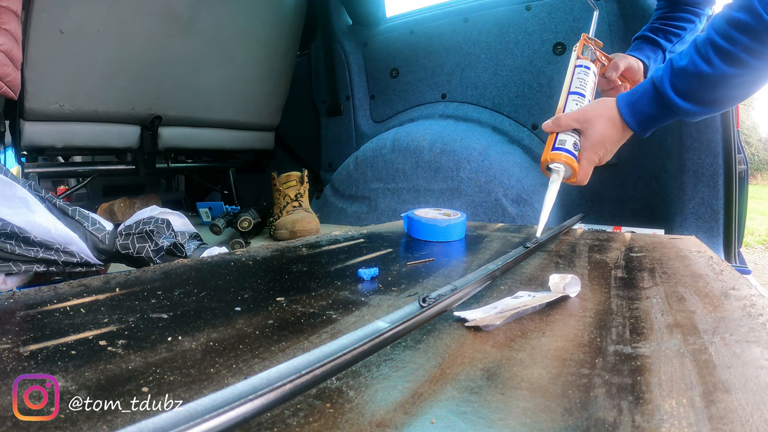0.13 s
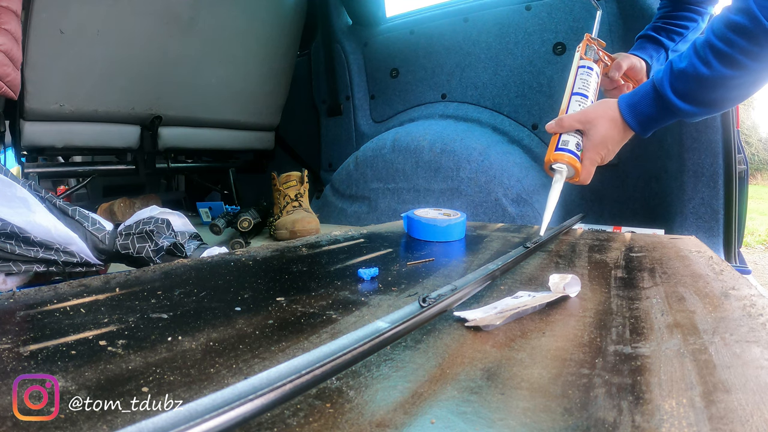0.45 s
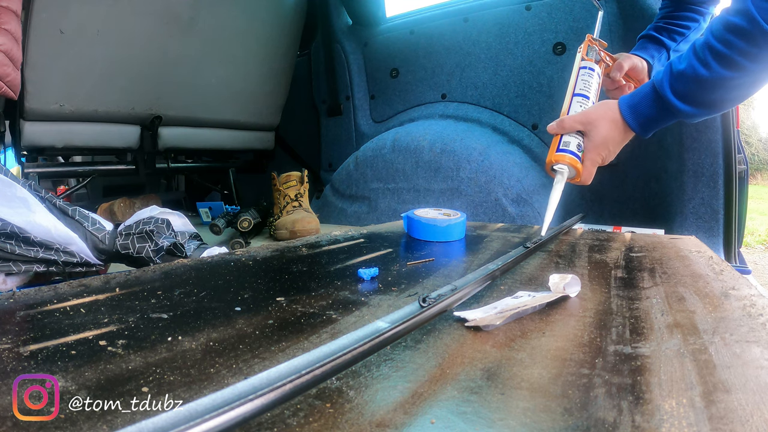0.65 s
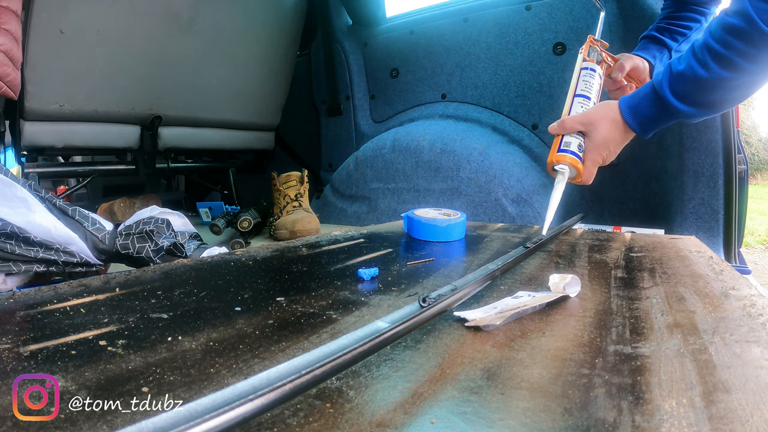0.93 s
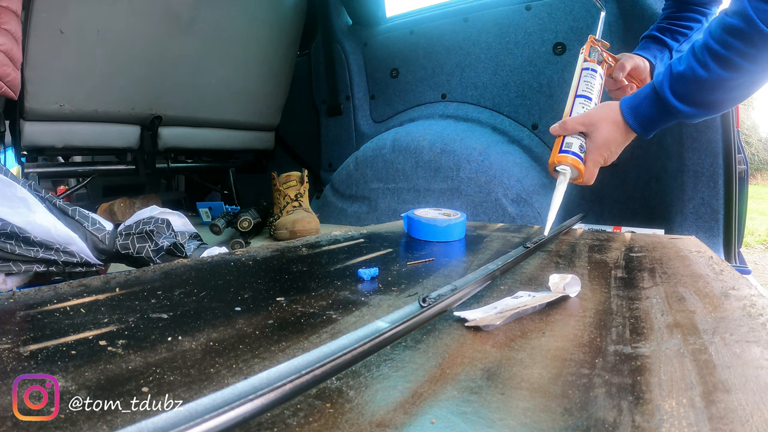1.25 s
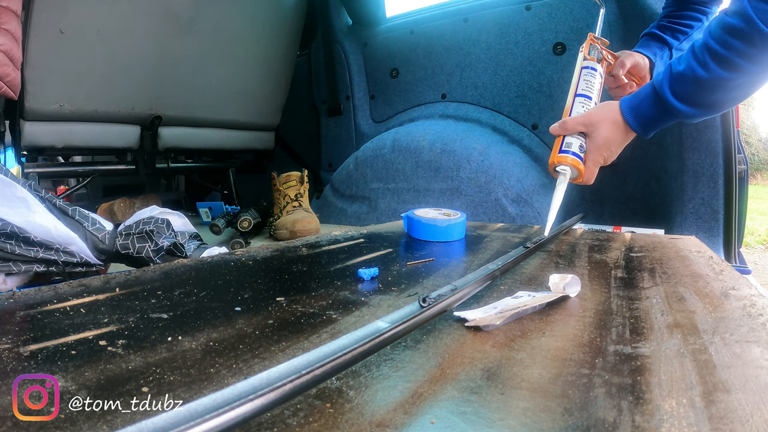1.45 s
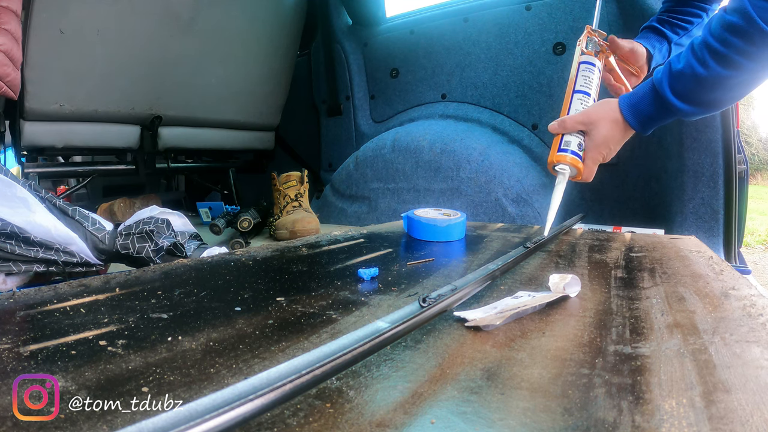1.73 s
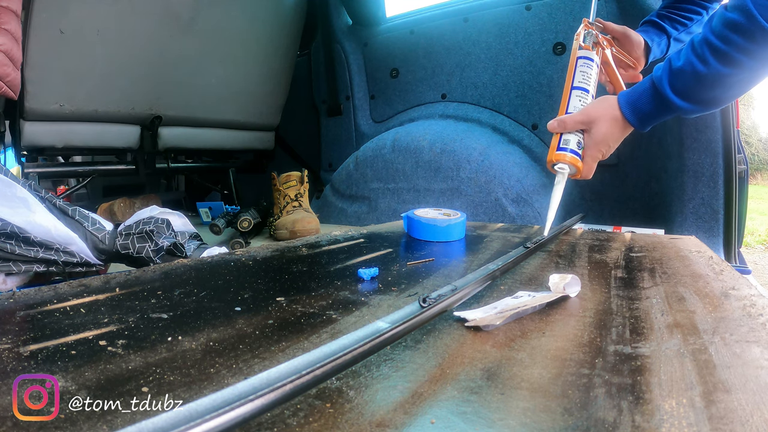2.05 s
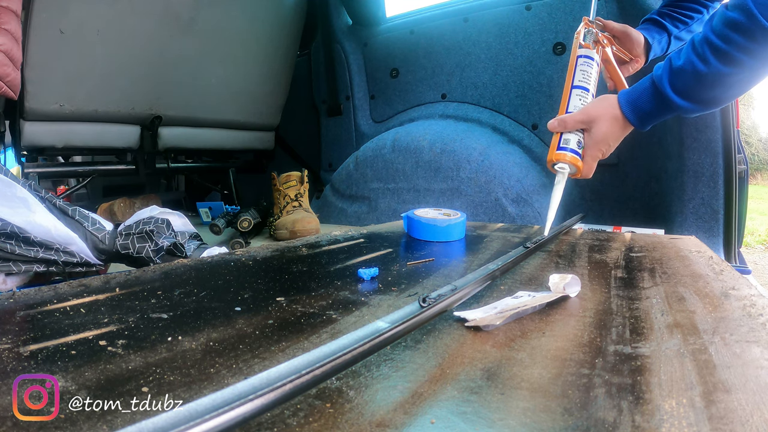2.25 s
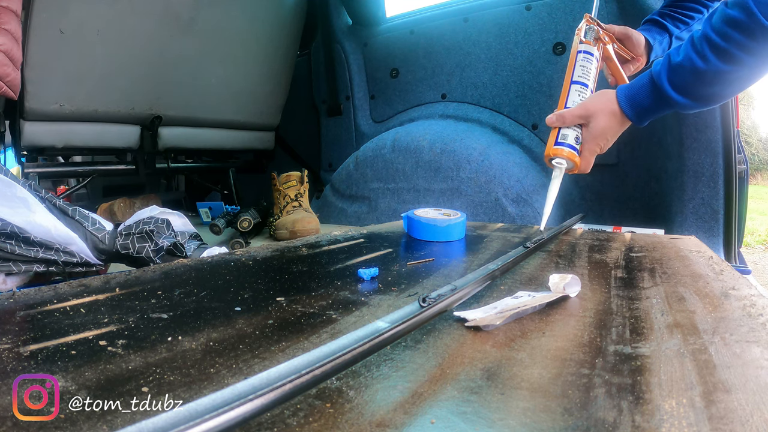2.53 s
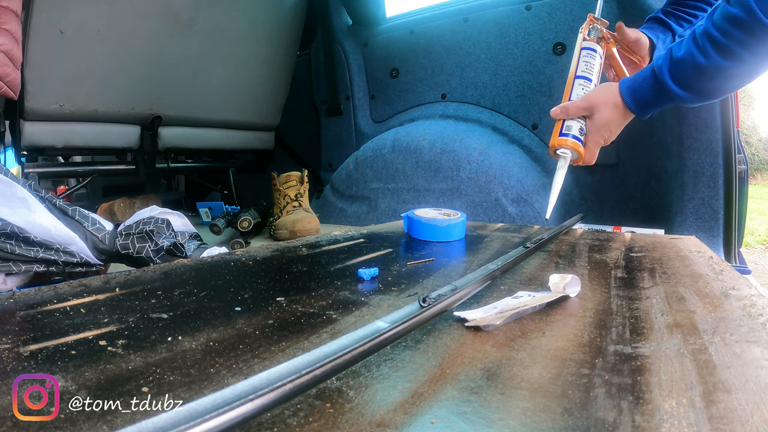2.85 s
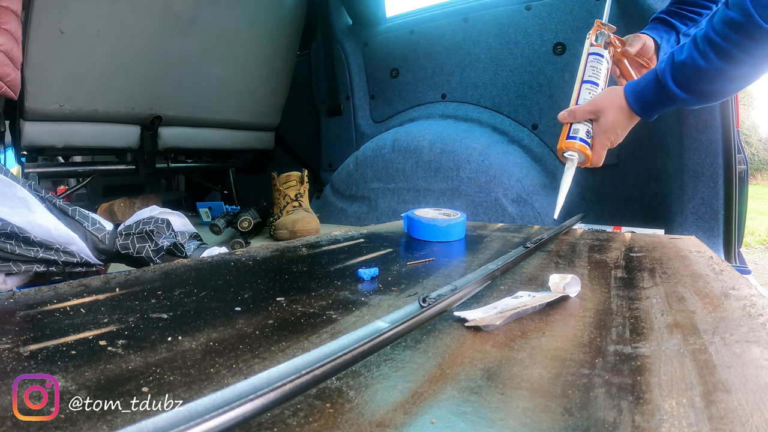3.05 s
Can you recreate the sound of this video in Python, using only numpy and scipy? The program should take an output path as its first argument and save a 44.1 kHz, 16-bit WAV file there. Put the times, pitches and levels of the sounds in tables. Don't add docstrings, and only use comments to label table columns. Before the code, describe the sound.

Metal catch of a caulking gun snaps softly, then cracks loudly, inside a quiet van.

```python
import sys
import numpy as np
from scipy import signal
from scipy.fft import rfft, irfft
from scipy.io import wavfile
from scipy.ndimage import uniform_filter1d

SR = 44100
rng = np.random.default_rng(int(sys.argv[2]) if len(sys.argv) > 2 else 0)


def unload_audio(sound):
    columns = np.transpose(np.atleast_2d(sound))
    steps = np.round(np.clip(columns, -1, 1) * 32767)
    wavfile.write(sys.argv[1], SR, steps.astype(np.int16))


def decibels_to_gain(level_db):
    exponent = np.asarray(level_db, float) / 20
    return 10 ** exponent


N = 141120


def evened(x):
    return x / np.sqrt(np.mean(x ** 2) + 1e-20)


def read(points, hz):
    f, value = np.transpose(points)
    return np.interp(np.log(hz + .1), np.log(f + .1), value)


def add(mix, s, sound):
    part = mix[round(s * SR):][:len(sound)]
    part += sound[:len(part)]


def colour(x, *tables):
    hz = np.fft.rfftfreq(len(x), 1 / SR)
    gain_db = sum(read(table, hz) for table in tables)
    return irfft(rfft(x) * decibels_to_gain(gain_db), len(x))


def ring(modes, flip=False):
    t = np.arange(round(0.8 * SR)) / SR
    out = np.zeros(len(t))
    for k, (hz, db, t60_s) in enumerate(modes):
        sign = (-1) ** (k * flip)
        out += sign * decibels_to_gain(db - 60 * t / t60_s) * np.sin(2 * np.pi * hz * t)
    return out


def burst(x, rise_s, t60_s=100):
    t = np.arange(len(x)) / SR
    return x * np.minimum(t / rise_s, 1) * decibels_to_gain(-60 * np.maximum(t - rise_s, 0) / t60_s)


def snaps():
    # t/s, crack level/dB, crack t60/s, cabin level/dB, metal level/dB
    releases = [
        (1.9683, -32.5, 0.025, -10.5, -45),
        (2.5353, -7, 0.01, -8.5, -18),
    ]
    # f/Hz, level/(dB per Hz)
    spectra = [
        [(300, -9.5), (900, -11.5), (1600, -9), (2800, -7), (4500, -13.5), (6500, -13.5), (10200, -22),
         (16000, -31)],
        [(300, -40.5), (1000, -24.5), (1600, -29), (2600, -22.5), (4900, -8), (7000, -9.5), (10000, -10),
         (16000, -18)],
    ]
    # f/Hz, level/dB, t60/s
    rods = [
        [(554, -22, .3), (1136, -14, .25), (1529, -22, .4), (1701, -25, .5), (1755, -25, .5), (2067, -20, .35),
         (2095, -27, .3), (2471, -9, .25), (2450, -23, .2), (2686, -21, .5)],
        [(425, -29, .3), (630, -28, .18), (985, -50, .5), (1550, -46, .6), (2202, -42, .6), (2227, -48, .6),
         (2972, -48, .5), (4414, -30, .13), (4560, -40, .3), (2552, -36, .12)],
    ]
    # f/Hz, level/dB, t60/s
    clangs = [
        [(937, 6, .04), (1850, 3, .045), (2800, 11, .045), (3580, 17, .024), (1130, 2, .04), (4150, 7, .025),
         (5170, 3, .03), (5780, 1, .025), (7520, -6, .025)],
        [(1050, -17, .025), (1900, -12, .03), (2700, -6, .026), (3570, 1, .028), (4070, -5, .04),
         (4350, -4, .045), (4670, 4, .045), (4870, 4, .045), (5700, -3, .035), (6060, 0, .045),
         (6850, -3, .035), (7740, -1, .022), (8880, -1, .025), (10300, 4, .028)],
    ]
    rises_s = [0.0021, 0.00083]
    sides_db = [-21, 2]
    # delay/s, level/dB
    echoes = [(.0042, -15), (.0072, -15.5), (0.015, -17.5)]
    # f/Hz, side minus mid/dB
    side_spectrum = [(60, -22), (150, -34), (380, -11), (950, -21.5), (2380, -17), (5980, -20),
                     (15000, -19.5)]
    mid, side = np.zeros((2, N))
    for release, spectrum, rod, clang, rise_s, side_db in zip(releases, spectra, rods, clangs, rises_s, sides_db):
        s, crack_db, t60_s, cabin_db, metal_db = release
        crack = decibels_to_gain(crack_db - 2) * crack_of(spectrum, t60_s)
        add(mid, s, crack)
        for delay_s, db in echoes:
            add(mid, s + delay_s, decibels_to_gain(db) * crack)

        walls = cabin()
        metal = decibels_to_gain(metal_db) * burst(ring(rod, flip=True) + ring(clang, flip=True), rise_s)
        metal_tail = signal.fftconvolve(metal, walls)[:len(metal)]
        add(mid, s, metal + decibels_to_gain(-13.5) * metal_tail)
        add(mid, s, decibels_to_gain(cabin_db) * signal.fftconvolve(crack, walls))

        side_tail = signal.fftconvolve(crack, cabin())
        add(side, s, decibels_to_gain(side_db) * burst(side_tail, rise_s=.012))
    hollow = cartridge()
    from_hard_snap = np.arange(N) > releases[1][0] * SR - 256
    return mid + hollow, colour(side, side_spectrum) + decibels_to_gain(-30) * hollow * from_hard_snap


def crack_of(spectrum, t60_s):
    z = rfft(burst(rng.standard_normal(4096), .0007, t60_s))
    flat = irfft(z / np.sqrt(uniform_filter1d(abs(z) ** 2, size=50)))
    x = colour(flat, spectrum)[:2048]
    return x / np.sqrt(np.mean(x[:128] ** 2))


def cartridge():
    # t/s, level/dB, f/Hz, t60/s
    hits = [
        (1.97, -48, 327, 0.073),
        (1.973, -46, 263, 0.1),
        (1.9908, -42, 265, 0.095),
        (2.07, -61, 2684, .05),
        (2.5312, -21.5, 646, .055),
        (2.5313, -23.5, 569, 0.05),
        (2.5316, -26.5, 430, .05),
        (2.531, -44, 203, 0.064),
        (2.531, -46.5, 95.1, 0.087),
        (2.545, -53, 264.3, 0.26),
    ]
    out = np.zeros(N)
    for s, db, hz, t60_s in hits:
        add(out, s, burst(ring([(hz, db, t60_s)]), rise_s=.003))
    return out


def cabin():
    # f/Hz, t60/s
    band_t60 = [(300, 0.22), (1500, 0.11), (4000, 0.067), (9000, 0.061), (15000, 0.031)]
    # f/Hz, level/dB
    slow_slope = [(2000, -19.5), (5000, -28), (9000, -31.5), (15000, -31.5)]
    size = 12288
    hz, t, z = signal.stft(rng.standard_normal(size), SR, nperseg=128)
    fast = decibels_to_gain(-60 * t / read(band_t60, hz)[:, None])
    slow = decibels_to_gain(-0.5 + read(slow_slope, hz)[:, None] - 60 * t / 0.24)
    tail = signal.istft(z * (fast + slow), SR, nperseg=128)[1][:size]
    tail = tail * np.minimum(np.arange(size) / 60, 1)
    return tail / np.linalg.norm(tail)


def creaks():
    # t/s, peak level/dB, f/Hz, ring level/dB
    slips = [(1.7152, -55.5, 7200, -15), (1.7724, -67, 5500, -4), (1.8018, -56, 3460, -23),
             (1.831, -57, 3200, -6), (1.8363, -57.5, 3460, 4.5), (1.8365, -62.5, 3150, 5),
             (1.8368, -66.5, 1900, 6.5), (1.8408, -66.5, 2850, 6.5), (1.85, -71, 2930, 5),
             (1.9134, -51, 3320, -24), (1.914, -60, 1900, -2), (1.9376, -57, 3380, -1),
             (1.9417, -45, 3300, -3), (1.946, -68, 4830, 2), (1.952, -59, 3180, 4), (1.954, -62, 2570, 4),
             (1.9582, -58, 3250, 3), (1.9631, -68.5, 3230, 5), (2.3394, -64.5, 3470, -2),
             (2.4464, -60.5, 3800, -10.5), (2.5292, -59, 9800, 0), (2.5317, -37.5, 2606, -7.5),
             (2.8144, -69.5, 3426, 5), (3.059, -57, 3404, -7)]
    t60_s, width_hz, tone_share = .018, 400, 0.84
    out = np.zeros(N)
    for s, db, hz, ring_db in slips:
        wide, narrow = rng.standard_normal((2, 2048))
        puff = colour(wide, [(hz / 5, -20), (hz / 1.6, 0), (hz * 2.4, -6), (hz * 3.6, -22)])
        narrow = colour(narrow, [(hz - width_hz, -30), (hz, 0), (hz + width_hz, -30)])
        tone = ring([(hz, 0, 100)])[:2048]
        rough = tone_share * evened(tone) + (1 - tone_share) * evened(narrow)
        add(out, s, decibels_to_gain(db - 1) * burst(puff, 0.0005, t60_s))
        add(out, s, decibels_to_gain(db + ring_db) * burst(rough, 0.00086, t60_s))
    return out


def floor_panel():
    # t/s, panel level/dB, panel f/Hz, sway level/dB
    nudges = [
        (1.627, -49, 133, -51.5),
        (1.723, -49.5, 128.4, -51.5),
        (1.85, -61.5, 141, -69),
        (1.909, -52.5, 129, -59),
        (1.978, -39.5, 140, -53),
        (2.06, -57, 134, -60.5),
        (2.181, -51.5, 120, -64),
        (2.384, -61.5, 136, -63.5),
    ]
    # f/Hz, level/dB, t60/s
    panel = [(127.4, 0.5, .3), (137.5, 2, .26)]
    # f/Hz, level/dB, t60/s
    sway = [(35.8, 0, 8.7), (46.23, -8, 1.2)]
    out = np.zeros(N)
    small_sway = burst(ring([(hz, db, 1) for hz, db, _ in sway]), 0.015)
    for s, panel_db, hz, sway_db in nudges:
        boom = burst(ring([(hz, panel_db, 100)]), rise_s=0.026, t60_s=0.11)
        add(out, s, boom + decibels_to_gain(sway_db) * small_sway)
    hard_boom = decibels_to_gain(-30) * ring(panel, flip=True)
    hard_sway = decibels_to_gain(-48.5) * burst(ring(sway), .02)
    add(out, 2.553, hard_boom + hard_sway)
    return out


def birds():
    # t/s, length/s, start f/Hz, end f/Hz, level/dB
    notes_sung = [(.37, .04, 1640, 1640, -76), (.41, .07, 1970, 1800, -73), (.47, .08, 1800, 1620, -76),
                  (.545, .035, 2750, 2200, -74), (.55, .08, 1580, 1460, -74), (1.033, .02, 2300, 2640, -68),
                  (1.047, .032, 2640, 2260, -67), (1.051, .035, 1270, 1240, -73),
                  (1.074, .018, 2260, 2560, -67), (1.105, .035, 1650, 1620, -72),
                  (1.15, .045, 1880, 1830, -75), (1.205, .03, 1750, 1710, -70),
                  (1.21, .09, 1100, 1080, -73), (1.24, .05, 1680, 1570, -75), (1.31, .05, 1130, 1080, -75)]
    warble_hz, warble_depth = 70, .007
    out = np.zeros(N)
    for s, length_s, from_hz, to_hz, db in notes_sung:
        u = np.linspace(0, 1, round(length_s * SR))
        warble = 1 + warble_depth * np.sin(2 * np.pi * warble_hz * length_s * u)
        hz = (from_hz + (to_hz - from_hz) * u) * warble
        whistle = np.sin(2 * np.pi * np.cumsum(hz) / SR)
        add(out, s, decibels_to_gain(db) * np.sin(np.pi * u) ** 0.59 * whistle)
    return out


def ticks():
    times_s = [0.066, 0.2695, .4728, 0.6801, 0.8831, 1.089, 1.2925, 1.4957, 1.7, 1.902, 2.112, 2.3158,
               2.5232, 2.7256, 2.9352, 3.1369]
    tick_hz, cycles, lag_s = 1350, 2.5, .0004
    phase = 2 * np.pi * tick_hz * np.arange(round(cycles * SR / tick_hz)) / SR
    overtones = np.sin(3 * phase) + .5 * np.sin(2 * phase) + .5 * np.sin(6 * phase)
    out = np.zeros(N)
    for s in times_s:
        size, edge, under = rng.standard_normal(3)
        sharp = .16 * decibels_to_gain(2 * edge) * overtones
        slow = .3 * decibels_to_gain(2 * under) * np.sin(phase * .4)
        add(out, s + lag_s, decibels_to_gain(-60 + .7 * size) * (-np.sin(phase) - sharp + slow))
    return out


def hiss():
    # f/Hz, level/(dB per Hz)
    hiss_spectrum = [(70, 1.5), (150, -2), (300, -8), (700, -11), (1500, -15.5), (3000, -20.5),
                     (6000, -24.5), (16000, -29)]
    # f/Hz, level/(dB per Hz)
    rumble_spectrum = [(1, -3), (8, -3), (25, -19), (50, -15), (90, -32.5), (200, -62.5)]
    # f/Hz, side minus mid/dB
    side_spectrum = [(60, -36), (150, -28), (380, -21.5), (950, -23.5), (2380, -17), (5980, -9.5),
                     (15000, -11.5)]
    # f/Hz, level/dB
    side_edge = [(11800, 0), (12300, -20)]
    a, b, c = rng.standard_normal((3, N))
    low_cut = [(30, -31.5), (70, 0.5)]
    scale = decibels_to_gain(-69.5) / np.std(colour(a, hiss_spectrum, [(60, -40.0), (100, 0)]))
    rumble = decibels_to_gain(-61) * evened(colour(c, rumble_spectrum))
    mid = scale * colour(a, hiss_spectrum, low_cut) + rumble
    side = scale * colour(b, hiss_spectrum, side_spectrum, side_edge, low_cut)
    return mid, side


def scene():
    # from t/s, to t/s
    dips_s = [(1.9615, 1.967), (2.518, 2.531)]
    t = np.arange(N) / SR
    mid, side = snaps()
    air, air_side = hiss()
    dipped = sum((t > a) & (t < b) for a, b in dips_s)
    hush = uniform_filter1d(decibels_to_gain(-9 * dipped), size=64)
    mid = mid + hush * (air + ticks()) + creaks() + floor_panel() + birds()
    side = side + hush * air_side
    return np.array([mid + side, mid - side])


def top_cut(x):
    return signal.sosfilt(signal.butter(12, 16670, fs=SR, output="sos"), x)


def record(dry):
    lowpass = signal.firwin(255, 15950, window=("kaiser", 9), fs=SR)
    x = signal.oaconvolve(dry, lowpass[None], "same")
    return top_cut(np.clip(x, -1, 1))


dry = scene()
out = record(dry)
unload_audio(out)
```